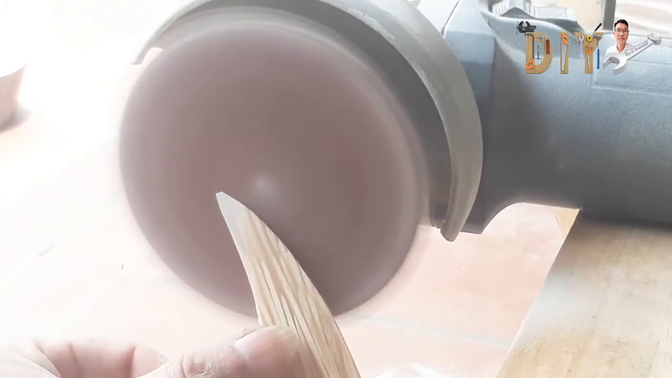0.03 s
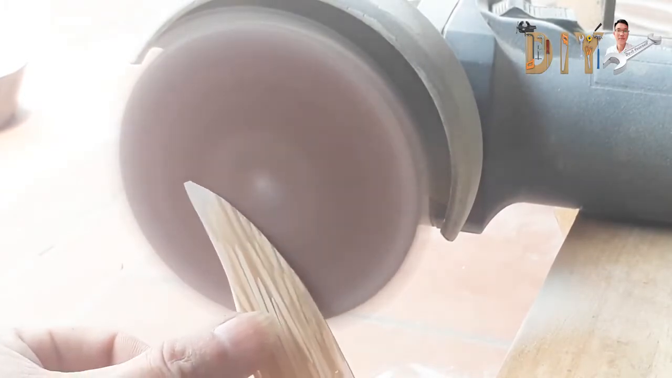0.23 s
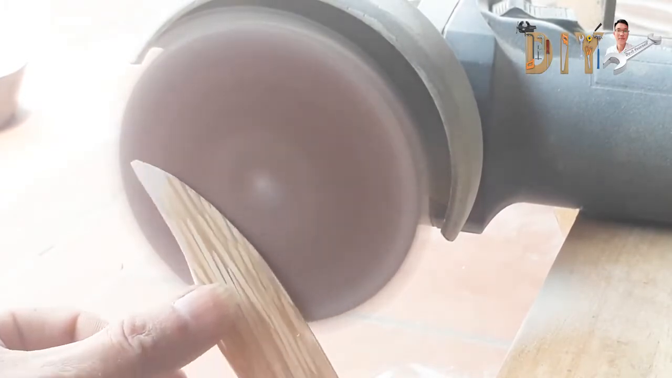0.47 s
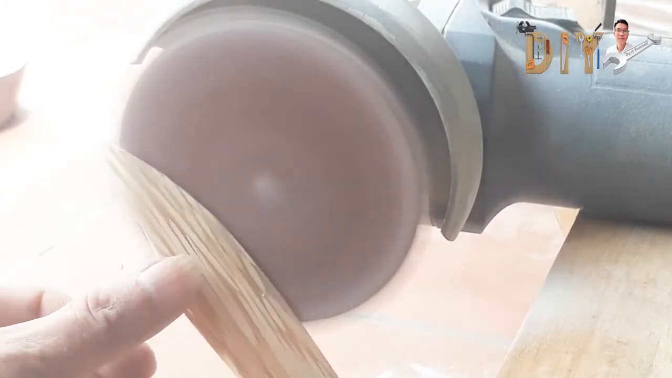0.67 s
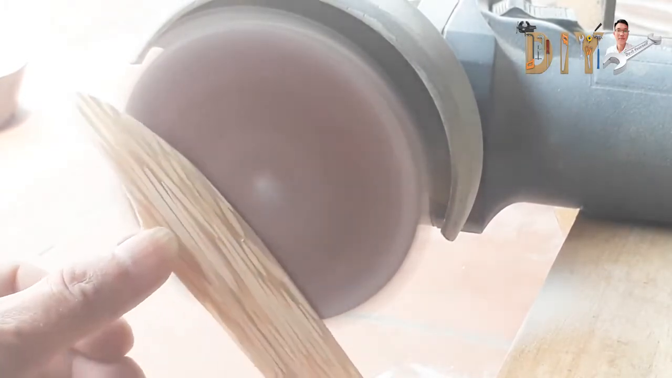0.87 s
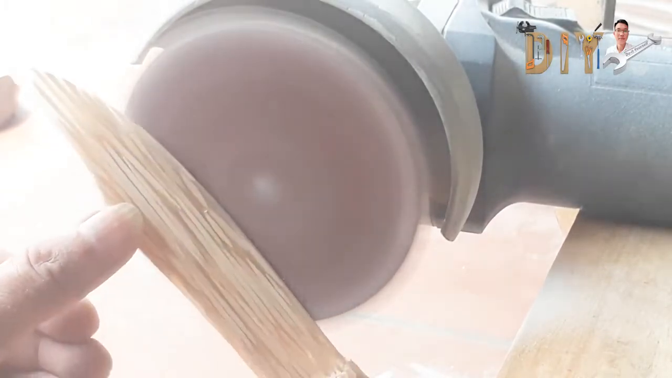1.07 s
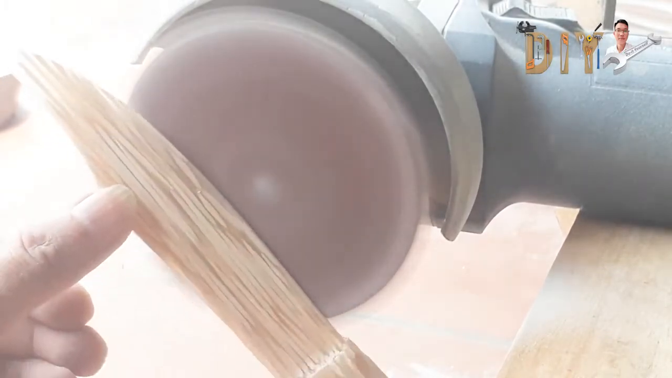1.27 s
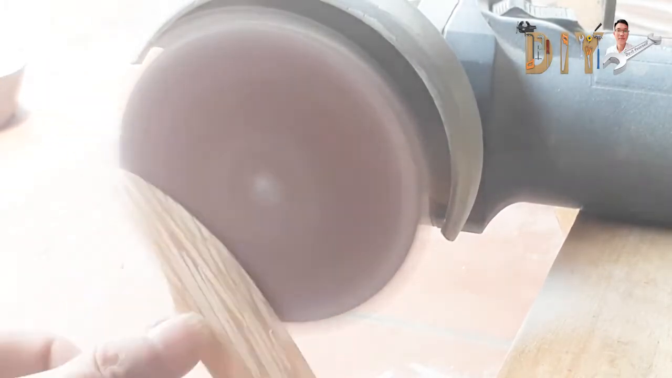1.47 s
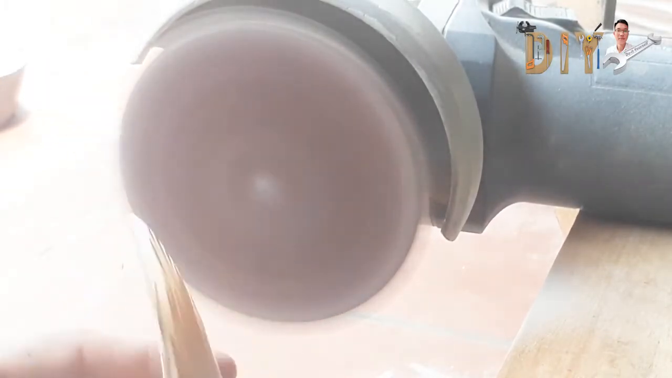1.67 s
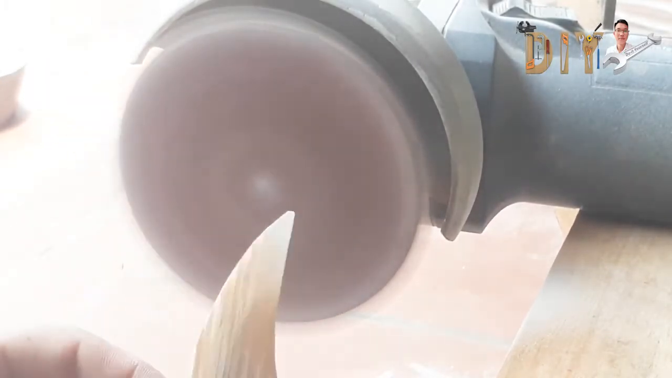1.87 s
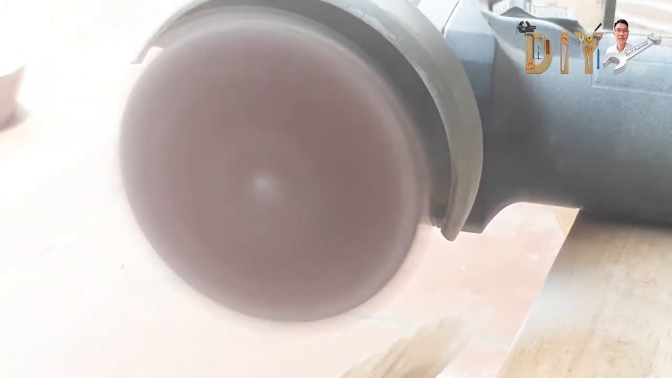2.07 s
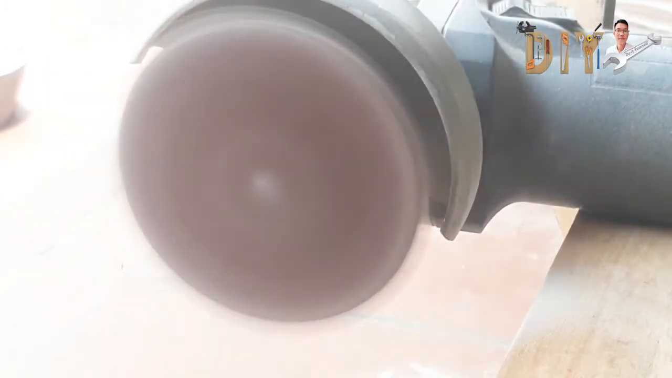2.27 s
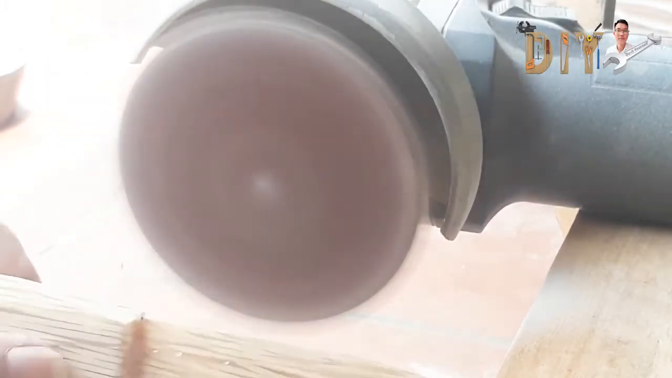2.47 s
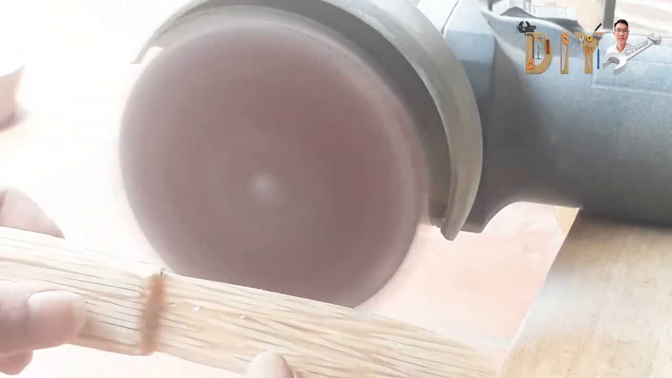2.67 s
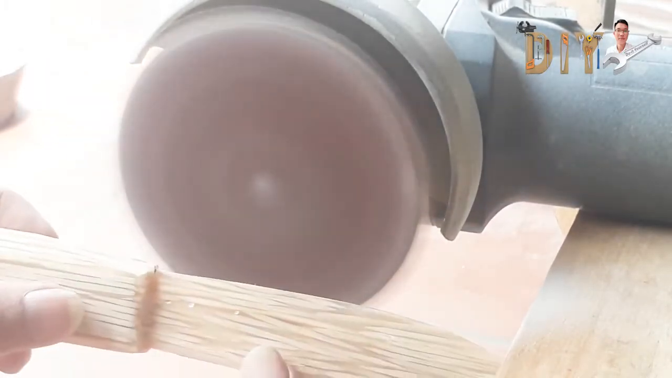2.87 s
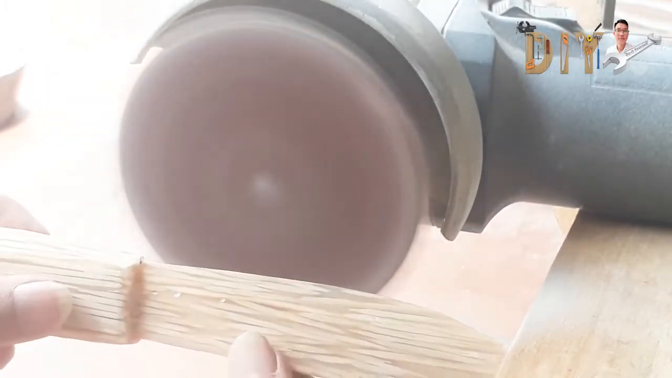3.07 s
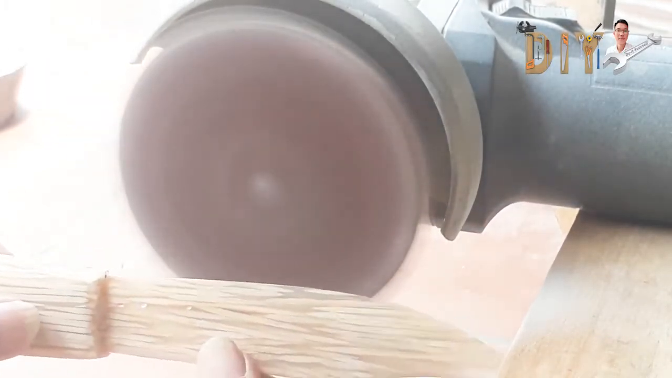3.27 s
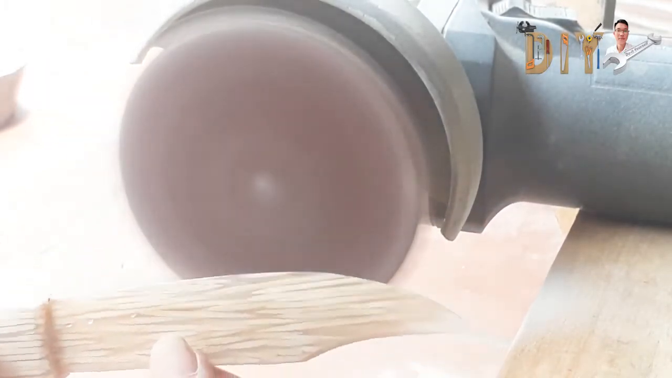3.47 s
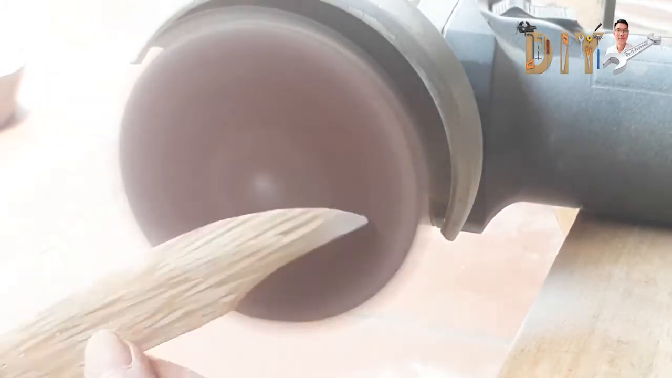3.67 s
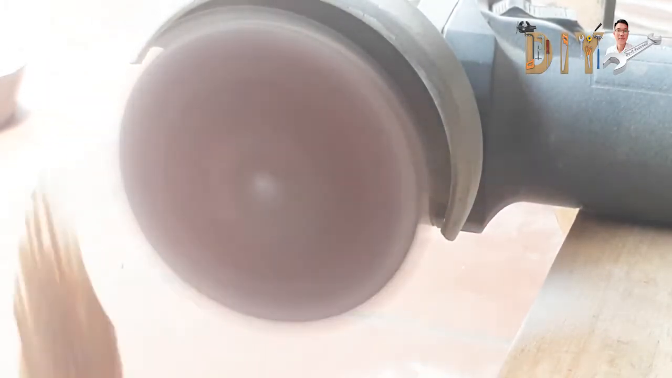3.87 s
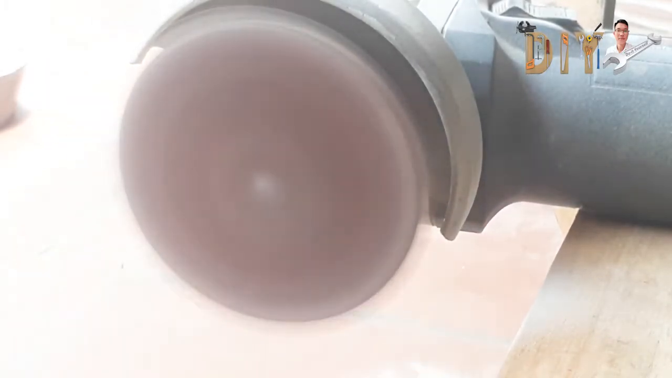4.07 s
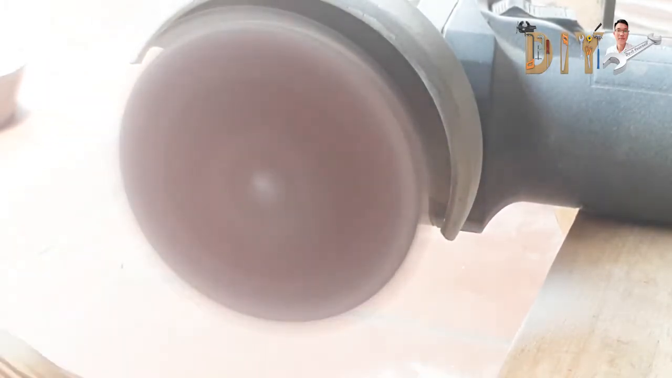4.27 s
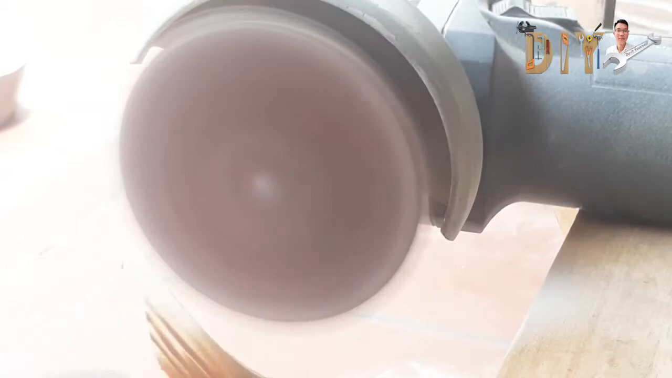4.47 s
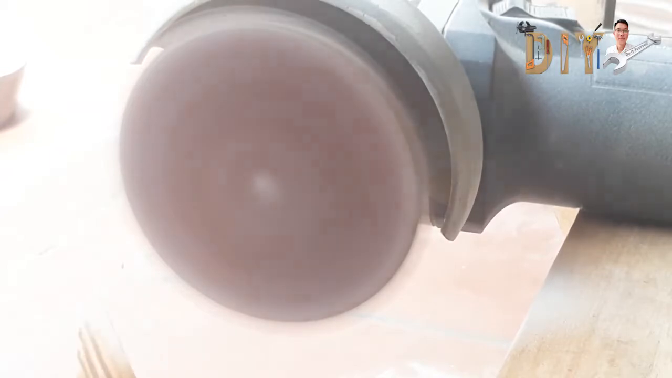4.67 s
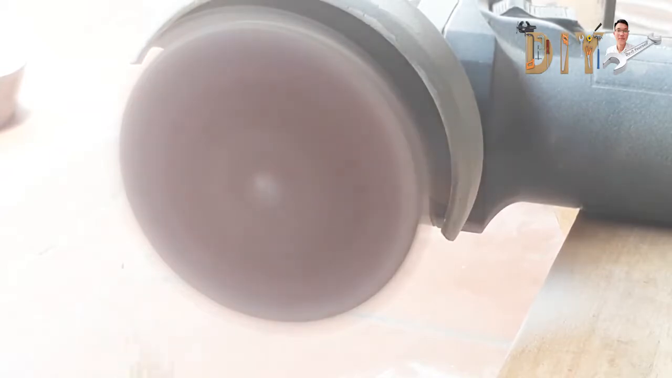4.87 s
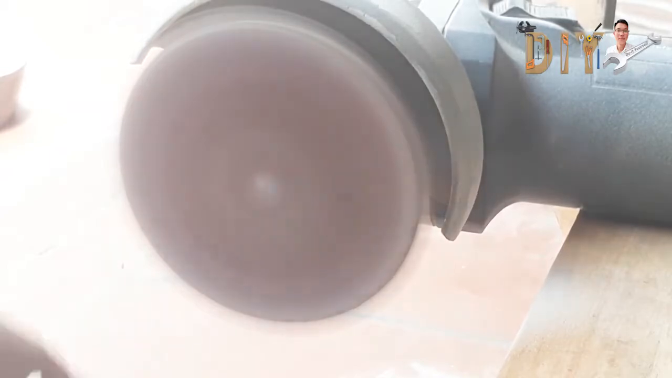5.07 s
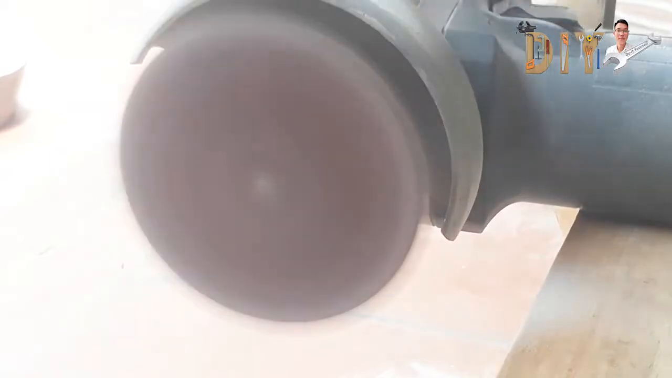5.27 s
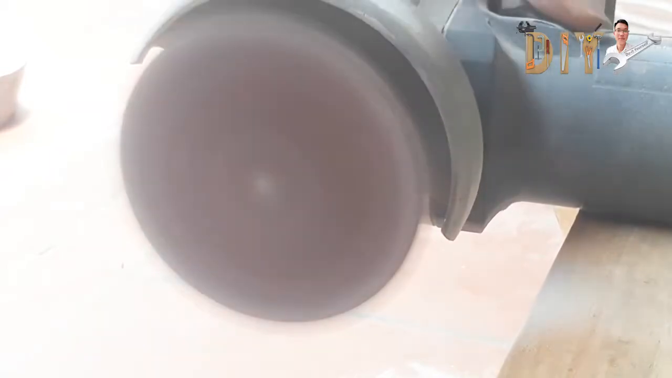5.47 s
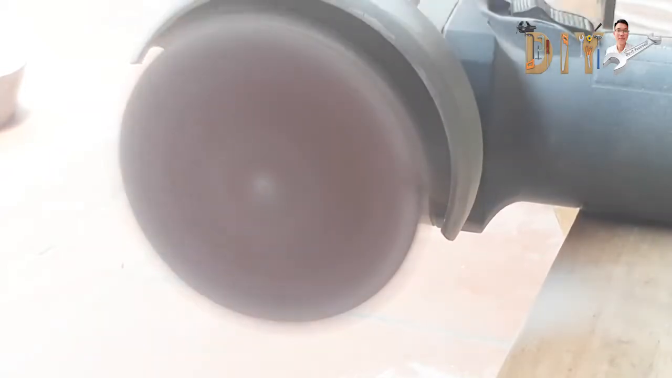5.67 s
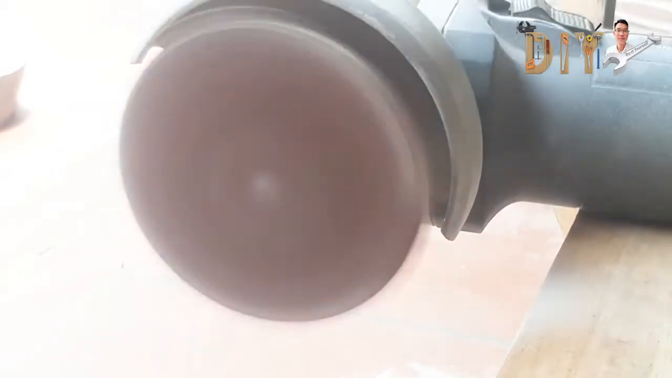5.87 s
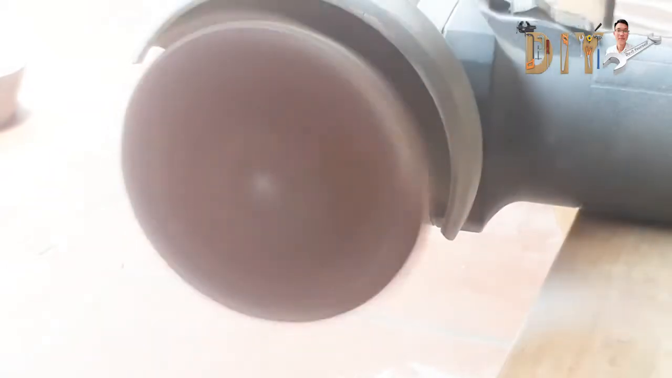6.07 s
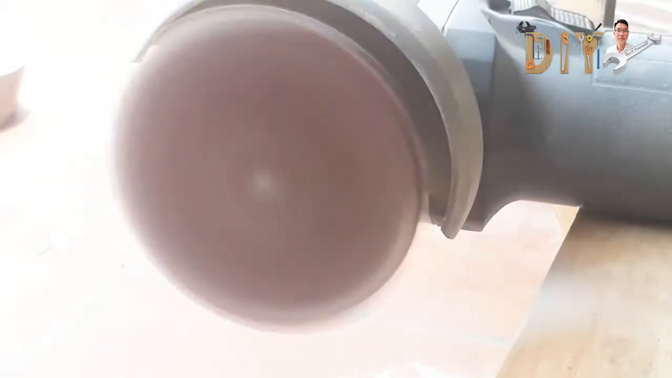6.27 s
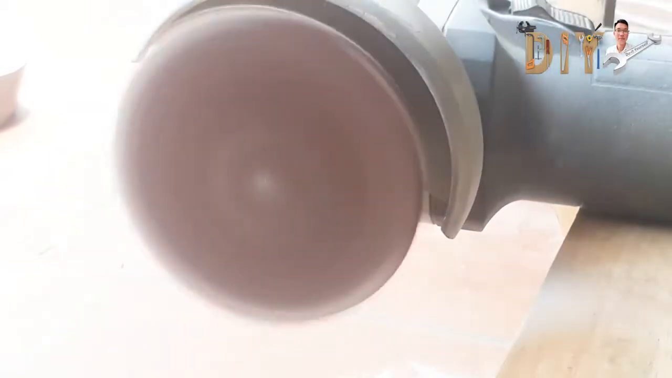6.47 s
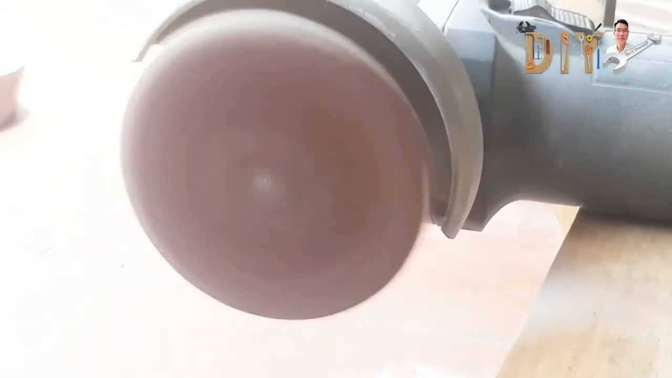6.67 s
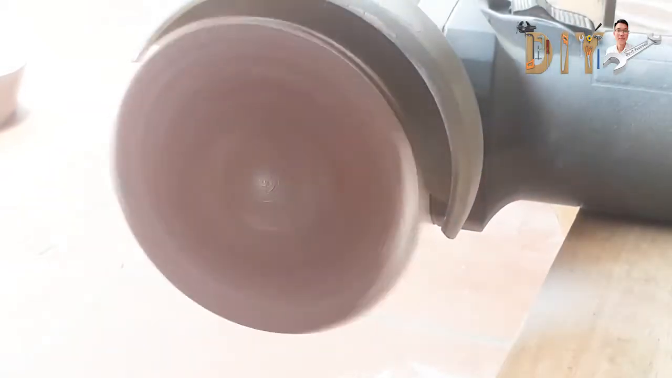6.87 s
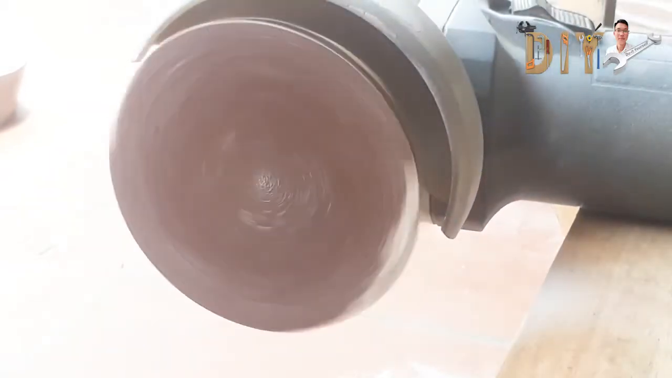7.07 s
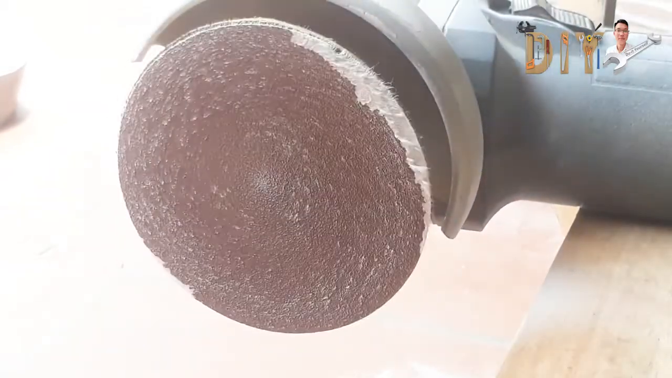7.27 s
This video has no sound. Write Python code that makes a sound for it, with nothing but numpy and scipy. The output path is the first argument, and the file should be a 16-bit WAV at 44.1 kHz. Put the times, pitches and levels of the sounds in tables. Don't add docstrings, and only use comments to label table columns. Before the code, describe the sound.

From 0 s an angle grinder with a sanding disc is already running at full speed, very close to a phone microphone in a small workshop. It is a dense, harsh, treble-heavy roar of fan air and gear clatter, with a buzzing bearing whine near 1570 Hz and rough overtones. Until about 5.6 s it stays nearly constant, the pitch dipping very slightly around 1.4 s and recovering by 2 s, the roar wavering gently. At about 5.63 s it is switched off: the drive tone briefly dips, then slides steadily down, swelling through housing resonances. At 6.2-6.4 s the disc shudders and wobbles. A fine, very high whine drops into hearing while the roar weakens into dry gear ticks, fading sharply after 7 s. Around 7.25 s it stops; a faint falling note and a quick rising bird chirp sound outside over slight room hiss.

```python
import sys
import numpy as np
from scipy import signal
from scipy.fft import rfft, irfft, next_fast_len
from scipy.io import wavfile
from scipy.ndimage import uniform_filter1d

SR = 44100
rng = np.random.default_rng(int(sys.argv[2]) if len(sys.argv) > 2 else 0)


def gain_from_decibels(decibels):
    exponent = np.asarray(decibels, float) / 20
    return 10 ** exponent


def output_pcm(signal):
    pcm = np.clip(np.atleast_2d(signal).T, -1, 1) * 32767
    wavfile.write(sys.argv[1], SR, np.round(pcm).astype(np.int16))


N = 323679

# t/s, f/Hz
POWERED_SPEED = [
    (0, 1571),
    (.5, 1566),
    (1.37, 1554),
    (2.03, 1572),
    (3.5, 1567),
    (4, 1572),
    (5.6, 1575),
]
BALLS_PER_TURN = 3.894
SWITCH_S, DRAG_HZ, DRAG_S, FRICTION_HZ_PER_S, CREEP_HZ = 5.633, 880.7, .4908, 435.5, 20
OFF_S = (5.53, 6.3)
WOBBLE_S = (6.2, 6.27, 6.332, 6.36)

BALL_ON_DB, BALL_OFF_DB, BALL_KNEE_HZ, BALL_DB_PER_OCT = -46.5, -44.5, 790, 25
REVERSE_S, REVERSE_WIDTH_S, REVERSE_DB = 5.655, 0.021, -15
# f/Hz, width/Hz, lift/dB
MOUNT_MODES = [(1268, 78, 10.5), (862, 67, 13), (715, 140, 12.5), (483, 20, 17), (382, 11, 18),
               (310, 20, 25)]
ROTOR_ON_DB, ROTOR_OFF_DB, ROTOR_STILL_DB = -55.5, -51, -90
ROTOR_LEAD_S, ROTOR_MOUNT_SHARE = .03, 0.24
# rotor multiple, level/dB powered, level/dB coasting, level/dB while the disc wobbles
ROTOR_OVERTONES = [(2, 9.5, -12, 2), (3, -4, -16, 6), (4, 1, -20, -8), (5, -20, -20, 9), (8, -20, -20, 6)]
# ball multiple, rotor multiple, level/dB powered, level/dB coasting
SIDEBANDS = [(1, -1, -9.5, -6), (1, 1, -1.5, -6), (1, 2, -6, 0), (1, 3, -6, -6), (2, -1, -8, -14),
             (2, 0, 2.5, -13), (2, 1, -6, -5), (2, 2, -9, -6), (2, 3, -4, -9), (3, 0, 0, -10),
             (3, 1, -5, -10), (5, 0, 2, -12), (6, 0, -2, -14)]
SIDE_ON_DB, SIDE_OFF_DB, SIDE_DB_PER_OCT2 = -47, -37.5, 8
# (t/s, width/s)
FLARE_RING, FLARE_S = (3050, 150, 9), (5.74, .06)

# t/s, level/dB
ROAR_LEVEL = [(0.0, -24.5), (0.97, -25.5), (1.05, -24.5), (2.55, -25.5), (2.59, -26.5), (3.15, -25),
              (4.23, -25.5), (4.41, -27), (4.49, -25), (5.7, -25), (5.76, -28), (6.07, -25.5),
              (6.33, -28.5), (6.35, -28.5), (6.55, -32), (6.96, -41.5), (7.02, -41), (7.26, -47.5)]
# t/s, share/0-1
TICK_SHARE = [
    (0, .25),
    (5.6, 0),
    (6.2, 0.6),
    (6.5, 0.92),
    (6.8, 0.95),
    (7.2, 0.62),
    (7.34, .6),
]
TEETH, TICK_S = 13.2, .0006
# f/Hz, level/dB per Hz
POWERED_COLOUR = [(40, -44), (100, -44.5), (170, -32), (400, -23.5), (700, -10.5), (1000, -15), (2000, -10),
                  (3100, -6.5), (4900, -7.5), (7500, -3.5), (10000, -4.5), (12000, -8), (13300, 1.5),
                  (16000, 3)]
COAST_COLOUR = [(40, -50), (100, -42), (200, -27.5), (400, -20), (800, -10.5), (1100, -14), (1800, -8.5),
                (3300, -11.5), (4800, -6.5), (6500, -2), (9000, -16), (11000, -13), (13500, -9),
                (16000, -14.5)]
# f/Hz, width/Hz, lift/dB powered, lift/dB coasting
HOUSING_MODES = [(327, 51, 5.5, 5.5), (514, 15, 8, 1), (707.3, 19, 9, -10), (850.2, 31, 13, 10),
                 (1310, 18, 8, 15.5), (1810, 27, 4, 11), (1916, 20, 8, 8), (3110, 130, 1, 3.5),
                 (4415, 140, 4, -4.5), (5530, 150, 4.5, -8), (6940, 480, 2, 3.5), (7480, 200, 3, 1),
                 (8860, 230, -3.5, 10), (9600, 540, -1, 7.5), (12000, 300, 2.5, 6), (14200, 750, 0, -4)]
BAND_EDGES = (4500, 7200, 10500)
BANDS_ON_DB, BANDS_OFF_DB, BANDS_LOOSE_DB = (-8.5, -8, -2, -5.5), (-6, -7.5, -1, -3), (-6.5, -5.5, -5.5, -13.5)
# t/s, share/0-1
SLACK = [(5.65, 0.1), (6.1, 0.48), (6.7, 0.92)]
CRAWL_S, CRAWL_DB_PER_S = 7.04, (6.8, 10, 33, 45)
STOP_S, STOP_DB_PER_S = 7.245, (200, 500, 500, 400)
# t/s, width/s, lift/dB
SHUDDERS = [
    (6.22, .12, 3),
    (6.38, .08, 4.5),
]
DRIFT_DB = .2
BENCH_DB, BENCH_S = -12, .012
ROOM_DB = -66

# f/Hz, level/dB
WHINE_LEVEL = [(1700, -74), (3000, -63), (5600, -53), (6600, -40), (8100, -53), (11000, -47), (15800, -49),
               (17500, -99)]
OCTAVE_DB, TWIN_DB, TWIN_FADE_HZ, BUNDLE_DB = -10.5, (4, 1), 500, -2
# t/s, level/dB
THIRD_WHINE = [(6.86, -99), (6.88, -56), (6.93, -59), (6.97, -75), (7.0, -99)]
CASE_RING, CASE_DB = (6300, 900, 30), -71

# t/s, length/s, from f/Hz, to f/Hz, level/dB
BIRD_NOTES = [
    (7.228, .035, 8600, 6700, -66),
    (7.274, .06, 7900, 9300, -47.5),
    (7.274, .06, 7800, 8400, -50),
]
GLIDE_S, BIRD_ATTACK_S, BIRD_FADE_DB_PER_S = .008, .013, 900

PATCH_EDGES_HZ, PATCH_SHARE, PATCH_DB = (4000, 5200, 6600, 8600, 10400, 12600, 14200, 15700), .05, -3.5
PATCH_LEAD = 645
TOP_HZ = 15780


def unit(x):
    return x / np.sqrt(np.mean(x ** 2))


def curves(table):
    s, *columns = np.transpose(table)
    return [np.interp(np.arange(N) / SR, s, c) for c in columns]


def walk(rate):
    k = int(SR / rate)
    held = np.repeat(rng.standard_normal(N // k + 1), k)
    return 1.3 * uniform_filter1d(uniform_filter1d(held, k), k)[:N]


def bump(t, centre, width):
    return np.exp(-((t - centre) / width) ** 2)


def rings(hz, modes):
    return sum(g / (1 + ((hz - m) / w) ** 2) for m, w, g in modes)


def speed(t):
    since = np.maximum(t - SWITCH_S, 0)
    lost = DRAG_HZ * (1 - np.exp(-since / DRAG_S)) + FRICTION_HZ_PER_S * since
    return np.maximum(curves(POWERED_SPEED)[0] - lost, CREEP_HZ)


def tone_levels(t, hz, cut):
    coast_db = BALL_OFF_DB - BALL_DB_PER_OCT * np.log2(np.maximum(BALL_KNEE_HZ / hz, 1))
    coast_db = coast_db + rings(hz, MOUNT_MODES)
    dip_db = REVERSE_DB * bump(t, REVERSE_S, REVERSE_WIDTH_S)
    ball_db = BALL_ON_DB + cut * (coast_db - BALL_ON_DB) + dip_db
    still = np.clip((t - WOBBLE_S[2]) / (WOBBLE_S[3] - WOBBLE_S[2]) / 2, 0, 1)
    rotor_db = ROTOR_ON_DB + cut * (ROTOR_OFF_DB - ROTOR_ON_DB) + still * (ROTOR_STILL_DB - ROTOR_OFF_DB)
    rotor_db = rotor_db + REVERSE_DB / 2 * bump(t + ROTOR_LEAD_S, REVERSE_S, REVERSE_WIDTH_S)
    rotor_db = rotor_db + ROTOR_MOUNT_SHARE * cut * rings(hz / BALLS_PER_TURN, MOUNT_MODES)
    side_db = SIDE_ON_DB + cut * (SIDE_OFF_DB - SIDE_ON_DB) - SIDE_DB_PER_OCT2 * np.log2(hz[0] / hz) ** 2
    return ball_db, rotor_db, side_db + dip_db / 2


def mode_gain(hz):
    return rings(hz, [(m, w, 1.5 * g) for m, w, _, g in HOUSING_MODES if m < 3500])


def bearing_sidebands(ball, turn, off, hz, side_db):
    flare = bump(np.arange(N) / SR, *FLARE_S)
    out = np.zeros(N)
    for b, r, on_db, off_db in SIDEBANDS:
        line_hz = (b + r / BALLS_PER_TURN) * hz
        db = side_db + on_db + off * (off_db - on_db + mode_gain(line_hz))
        db = db + 1.7 * walk(20) - 6 * off * np.abs(walk(14))
        db = db + flare * rings(line_hz, [FLARE_RING])
        out += gain_from_decibels(db) * np.sin(b * ball + r * turn + 6 * rng.random() + 0.41 * walk(25))
    return out


def rotor_overtones(turn, cut, rotor_db):
    wobble = np.interp(np.arange(N) / SR, WOBBLE_S, (0, 1, 1, 0))
    out = np.zeros(N)
    for r, on_db, off_db, wobble_db in ROTOR_OVERTONES:
        db = rotor_db + on_db + cut * (off_db - on_db) + wobble * (wobble_db - off_db) + 1.6 * walk(25.04)
        out += gain_from_decibels(db) * np.sin(r * turn + 6 * rng.random() + 0.27 * walk(25))
    return out


def response(colour, modes, size=8192):
    f = np.arange(1, size // 2 + 2) * SR / size
    hz, db = np.transpose(colour)
    db = np.interp(np.log(f), np.log(hz), np.maximum(db, -70))
    db = db + sum(g / (1 + (2 * (f - m) / w) ** 2) for m, w, g in modes)
    cepstrum = irfft(np.log(gain_from_decibels(db)))
    cepstrum[1:size // 2] *= 2
    cepstrum[size // 2 + 1:] = 0
    return irfft(np.exp(rfft(cepstrum)))


def bands(x, size):
    f = np.arange(size // 2 + 1) * SR / size
    below = [0] + [1 / (1 + (f / hz) ** 8) for hz in BAND_EDGES] + [1]
    spectrum = rfft(x, size)
    return [unit(irfft(spectrum * (hi - lo), size)[:N]) for lo, hi in zip(below, below[1:])]


def clatter_and_air(turn, off):
    share = np.clip(curves(TICK_SHARE)[0], 0, 1)
    tooth = np.diff(np.floor(TEETH * turn / (2 * np.pi) + .4 * walk(900)), prepend=0) > 0
    power = tooth * gain_from_decibels(4.5 * rng.standard_normal(N) + 4.5 * off * walk(100))
    power = signal.lfilter([1], [1, -np.exp(-2 / (TICK_S * SR))], power)
    power = power / (uniform_filter1d(power, SR // 16) + 1e-12)
    drive = rng.standard_normal(N) * np.sqrt(share * power + 1 - share)
    drive = drive * (1 + .04 * np.cos(turn))
    return drive * gain_from_decibels(.5 * walk(12) + 0.31 * walk(40))


def roar_levels(t, cut, slack):
    levels = []
    states = zip(BANDS_ON_DB, BANDS_OFF_DB, BANDS_LOOSE_DB, CRAWL_DB_PER_S, STOP_DB_PER_S)
    for on, coast, loose, crawl_fall, stop_fall in states:
        db = on + cut * (coast - on) + slack * (loose - coast)
        db = db - crawl_fall * np.maximum(t - CRAWL_S, 0) - stop_fall * np.maximum(t - STOP_S, 0)
        levels.append(db)
    for k, (s, width, db) in enumerate(SHUDDERS):
        levels[k] = levels[k] + db * bump(t, s, width)
    return levels


def roar(turn, off, cut):
    drive = clatter_and_air(turn, off)
    powered_modes = [(m, w, on) for m, w, on, _ in HOUSING_MODES]
    loose_modes = [(m, w, coast) for m, w, _, coast in HOUSING_MODES]
    powered = signal.fftconvolve(drive, response(POWERED_COLOUR, powered_modes))[:N]
    loose = signal.fftconvolve(drive, response(COAST_COLOUR, loose_modes))[:N]
    slack, = curves(SLACK)
    effort_db, = curves(ROAR_LEVEL)
    size = next_fast_len(N)
    levels = roar_levels(np.arange(N) / SR, cut, slack)
    out = np.zeros(N)
    for db, tight, slackened in zip(levels, bands(powered, size), bands(loose, size)):
        db = effort_db + db + .5 * walk(7.9) + DRIFT_DB * (1 - cut) * walk(2.515)
        out += gain_from_decibels(db) * ((1 - slack) * tight + slack * slackened)
    return out


def bench(x):
    echoes = np.diff(rng.standard_normal(SR // 20 + 1)) * np.exp(-np.arange(SR // 20) / (BENCH_S * SR))
    echoes = gain_from_decibels(BENCH_DB) * echoes / np.sqrt(np.sum(echoes ** 2))
    return (x + signal.fftconvolve(x, echoes)[:N]) / np.sqrt(1 + gain_from_decibels(2 * BENCH_DB))


def room_air():
    room = gain_from_decibels(ROOM_DB) * unit(signal.lfilter([1], [1, -.8], rng.standard_normal(N)))
    return signal.sosfilt(signal.butter(3, 200, "high", fs=SR, output="sos"), room)


def whine_db(hz):
    whine_hz, db = np.transpose(WHINE_LEVEL)
    return np.interp(np.log(hz), np.log(whine_hz), db)


def cage_whine(ball, hz):
    blur = .6 * walk(300)
    main_db = whine_db(24 * hz) - 5 * bump(hz, 570, 40) + 2.5 + 2.5 * walk(60)
    out = gain_from_decibels(main_db) * np.sin(24 * ball + blur)
    octave_db = whine_db(48 * hz) + OCTAVE_DB + 4 + 1.5 * walk(60)
    out += gain_from_decibels(octave_db) * np.sin(48 * ball + 2 * blur)
    fast = np.clip(hz / TWIN_FADE_HZ - 1, 0, .1) * 10
    for k, db in zip((23, 25), TWIN_DB):
        out += fast * gain_from_decibels(whine_db(k * hz) + db + 2.5 * walk(60)) * np.sin(k * ball + blur)
    for k in (47, 49):
        db = whine_db(k * hz) + OCTAVE_DB + BUNDLE_DB + 4 + 3 * walk(60)
        out += gain_from_decibels(db) * np.sin(k * ball + 2 * blur)
    return out + gain_from_decibels(curves(THIRD_WHINE)[0]) * np.sin(72 * ball + 3 * blur)


def case_ring(ball, hz):
    out = np.zeros(N)
    for k in range(8, 15):
        db = CASE_DB + rings(k * hz, [CASE_RING]) + 3 * walk(40)
        out += gain_from_decibels(db) * np.sin(k * ball + .5 * walk(80))
    return bump(np.arange(N) / SR, *SHUDDERS[1][:2]) * out


def tones(ball, turn, off, cut, hz):
    ball_db, rotor_db, side_db = tone_levels(np.arange(N) / SR, hz, cut)
    out = gain_from_decibels(ball_db) * np.sin(ball) + gain_from_decibels(rotor_db) * np.sin(turn)
    out += bearing_sidebands(ball, turn, off, hz, side_db)
    out += rotor_overtones(turn, cut, rotor_db)
    out += cage_whine(ball, hz) + case_ring(ball, hz)
    return np.sqrt(2) * signal.sosfilt(signal.butter(4, 150, "high", fs=SR, output="sos"), out)


def bird():
    call = np.zeros(N)
    for start, length, from_hz, to_hz, db in BIRD_NOTES:
        age = np.clip(np.arange(N) / SR - start, 0, length)
        hz = to_hz + (from_hz - to_hz) / np.cosh(age / GLIDE_S)
        rise = np.minimum(age / BIRD_ATTACK_S, 1) ** 2 * (age < length)
        fade = gain_from_decibels(db - BIRD_FADE_DB_PER_S * np.maximum(age - BIRD_ATTACK_S, 0))
        call += rise * fade * np.sin(2 * np.pi * np.cumsum(hz) / SR)
    tail = rng.standard_normal(SR // 8) * np.exp(-np.arange(SR // 8) / (0.027 * SR))
    return call + gain_from_decibels(-31) * signal.fftconvolve(call, tail)[:N]


def scene():
    t = np.arange(N) / SR
    ball_hz = speed(t)
    ball = 2 * np.pi * np.cumsum(ball_hz) / SR
    turn = ball / BALLS_PER_TURN
    off = np.interp(t, OFF_S, (0, 1))
    cut = np.clip((t - SWITCH_S) / 0.11, 0, 1)
    grinder = tones(ball, turn, off, cut, ball_hz) + bench(roar(turn, off, cut))
    mono = grinder + bird() + room_air()
    return np.array([mono, mono])


def side_patches(mono):
    f, _, cells = signal.stft(np.pad(mono, (PATCH_LEAD, 0)), SR, "cosine", 2048, 1024)
    chosen = rng.random((len(PATCH_EDGES_HZ) + 1, cells.shape[1])) < PATCH_SHARE
    chosen[[0, -1]] = False
    random_phase = np.exp(2j * np.pi * rng.random(cells.shape))
    cells = cells * chosen[np.searchsorted(PATCH_EDGES_HZ, f)] * random_phase
    side = signal.istft(cells, SR, "cosine", 2048, 1024)[1]
    return gain_from_decibels(PATCH_DB) * side[PATCH_LEAD:PATCH_LEAD + N]


def band_limit(x):
    return signal.sosfilt(signal.butter(12, 16640, fs=SR, output="sos"), x)


def record(dry):
    size = next_fast_len(N)
    both = rfft(dry + side_patches(dry[0]) * np.array([[1], [-1]]), size)
    f = np.arange(size // 2 + 1) * SR / size
    both = both * np.clip((TOP_HZ - f) / 60, 0, 1)
    mix = irfft(both, size)[:, :N]
    return band_limit(mix)


dry = scene()
out = record(dry)
output_pcm(out)
```